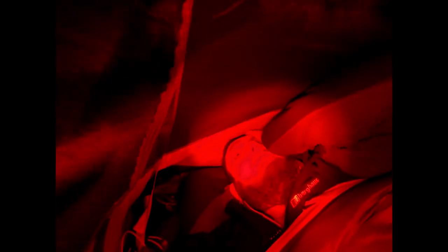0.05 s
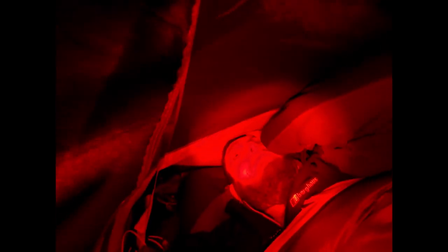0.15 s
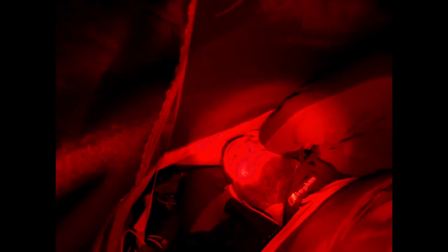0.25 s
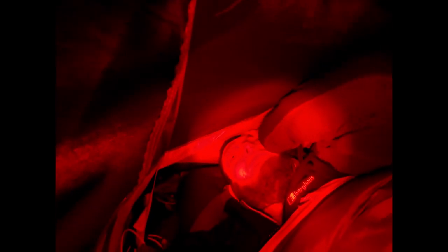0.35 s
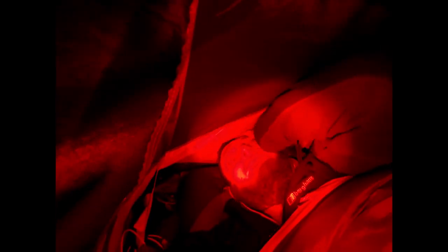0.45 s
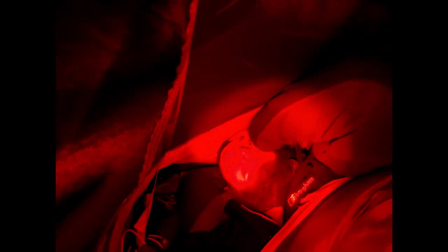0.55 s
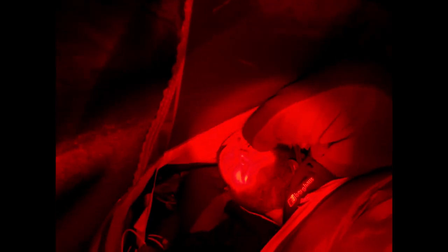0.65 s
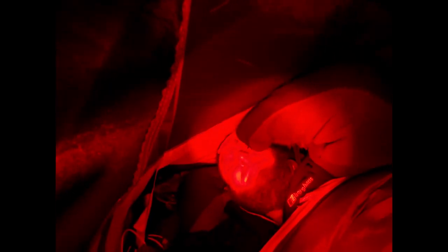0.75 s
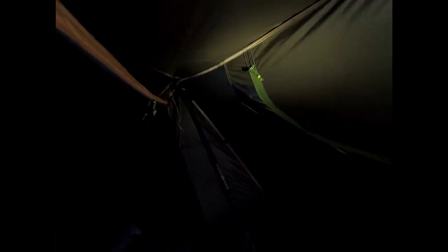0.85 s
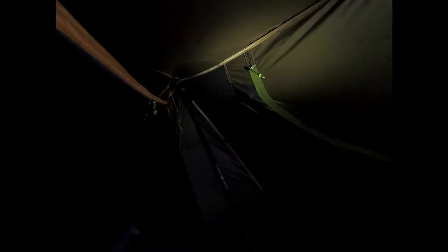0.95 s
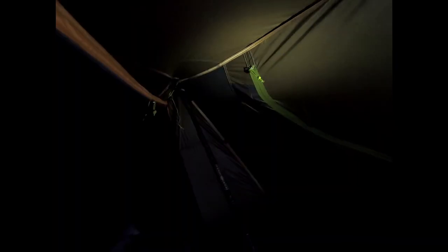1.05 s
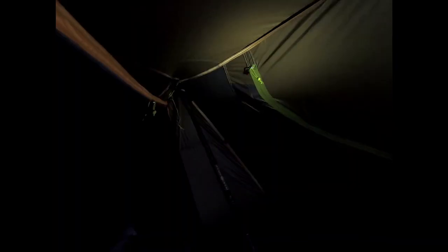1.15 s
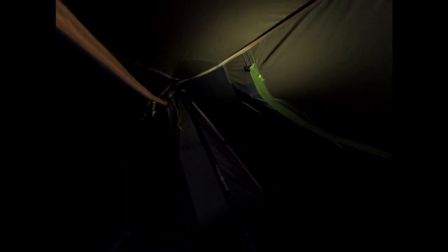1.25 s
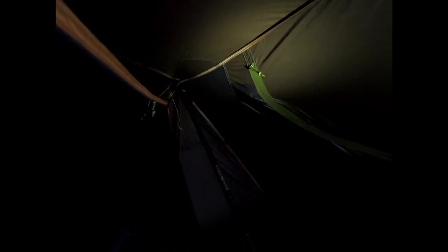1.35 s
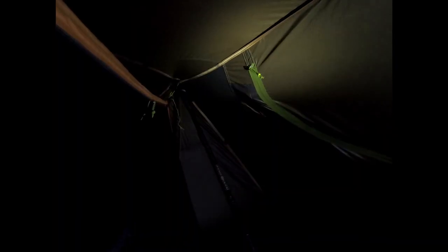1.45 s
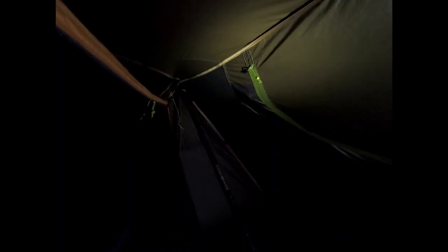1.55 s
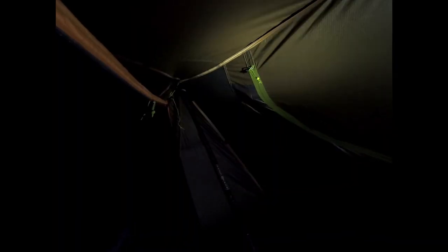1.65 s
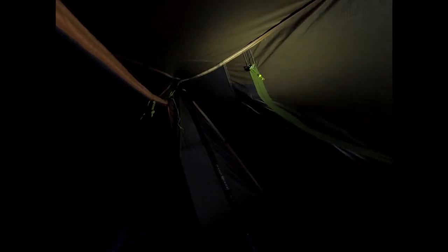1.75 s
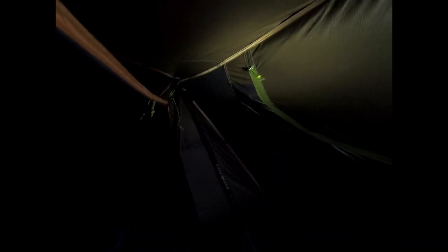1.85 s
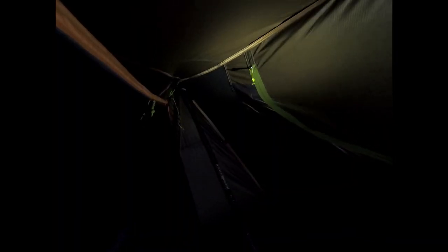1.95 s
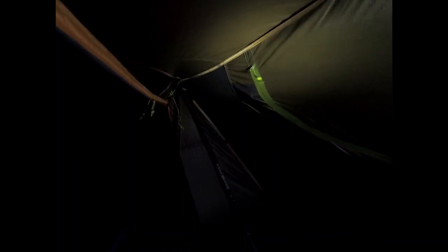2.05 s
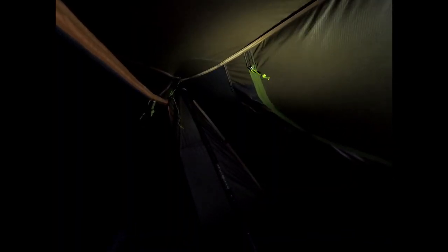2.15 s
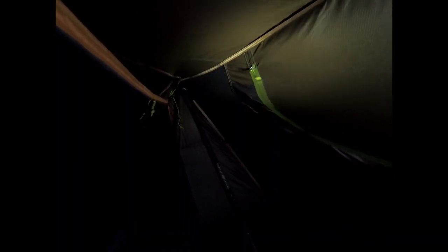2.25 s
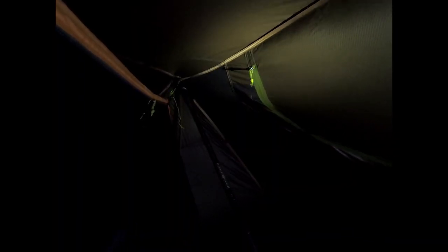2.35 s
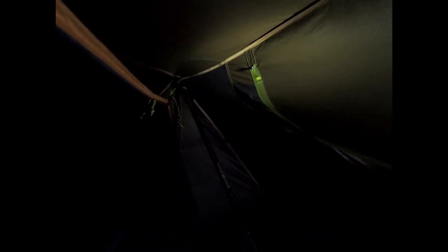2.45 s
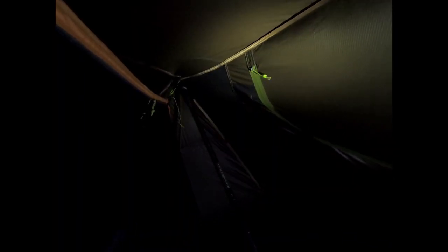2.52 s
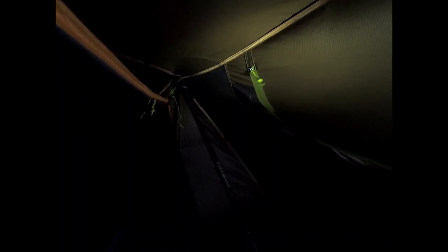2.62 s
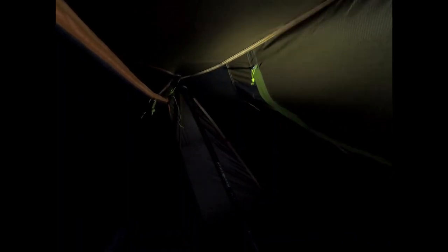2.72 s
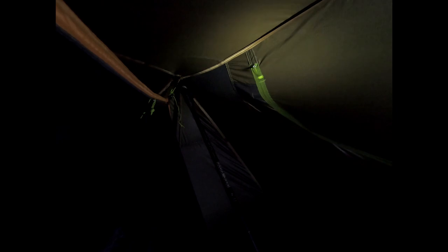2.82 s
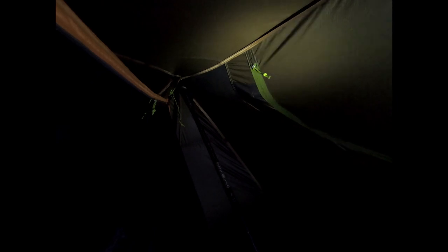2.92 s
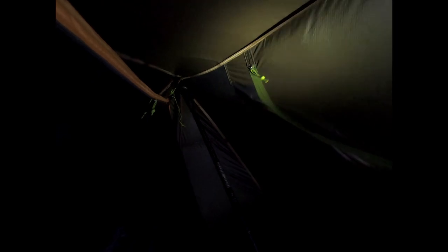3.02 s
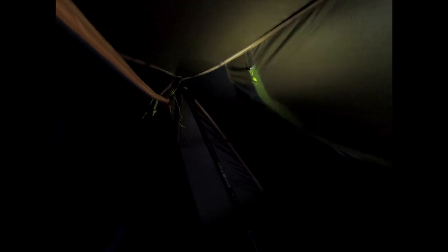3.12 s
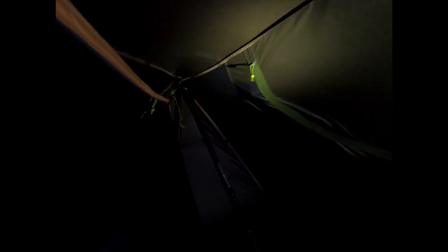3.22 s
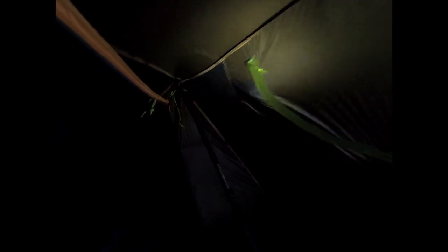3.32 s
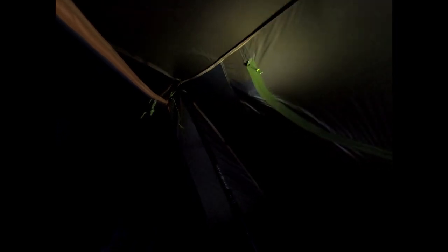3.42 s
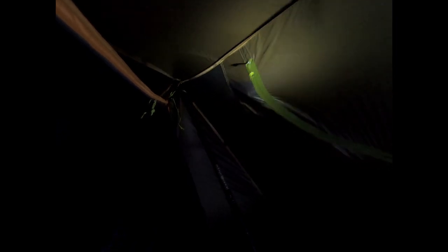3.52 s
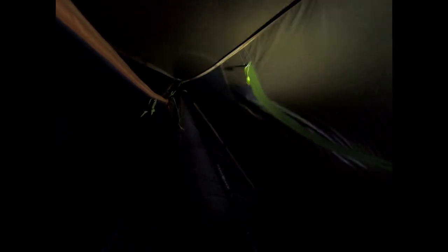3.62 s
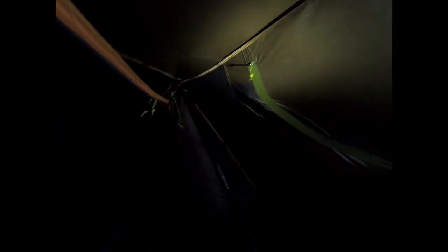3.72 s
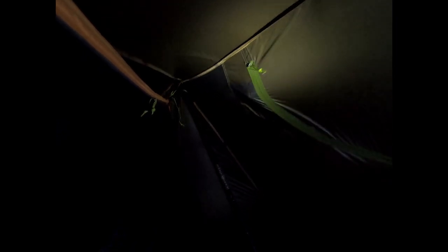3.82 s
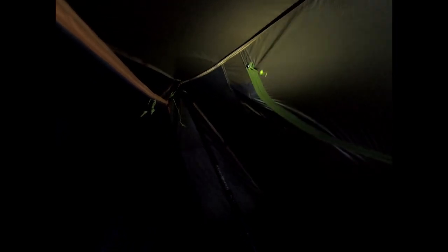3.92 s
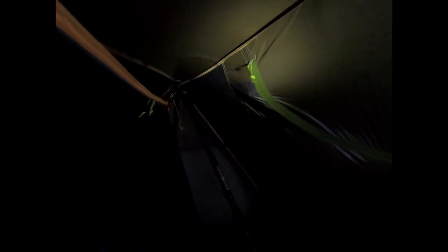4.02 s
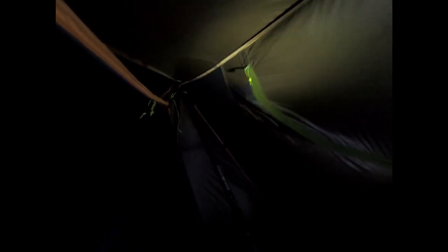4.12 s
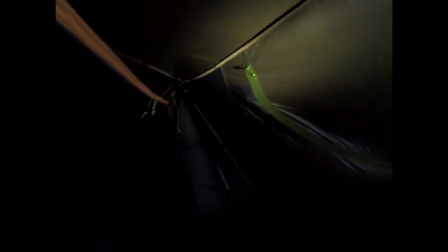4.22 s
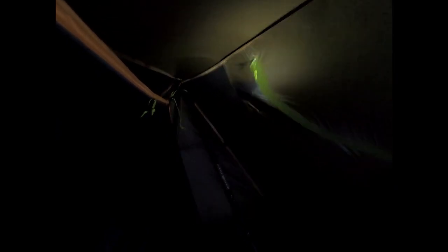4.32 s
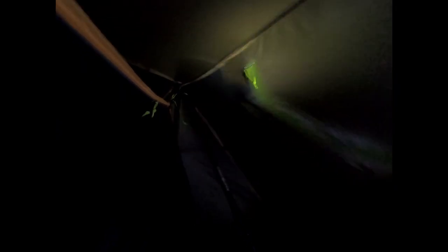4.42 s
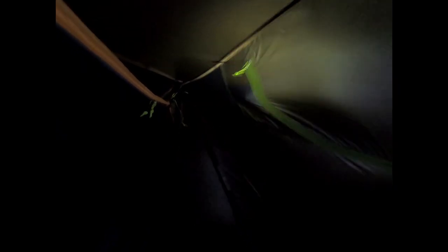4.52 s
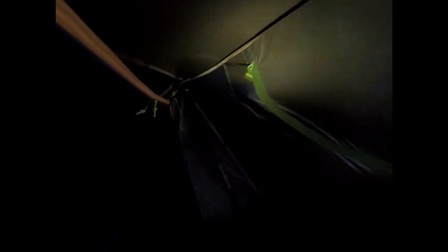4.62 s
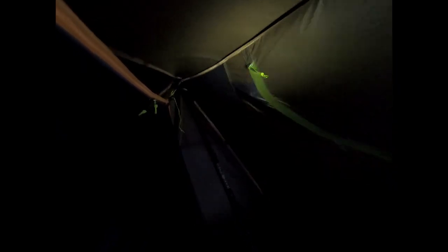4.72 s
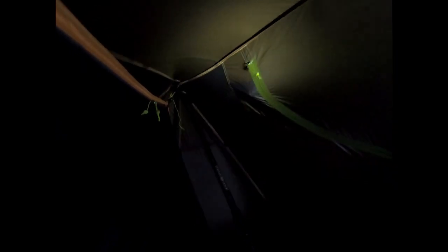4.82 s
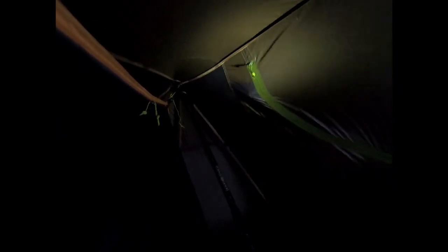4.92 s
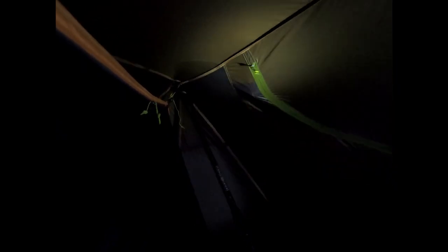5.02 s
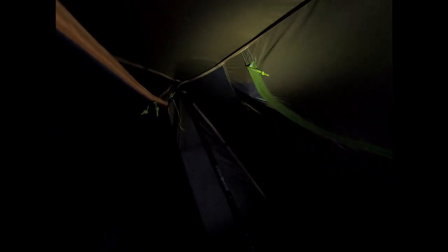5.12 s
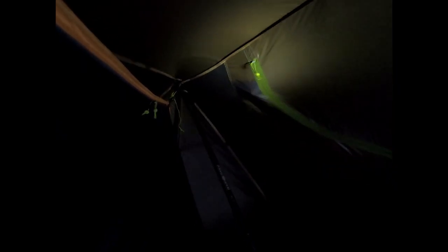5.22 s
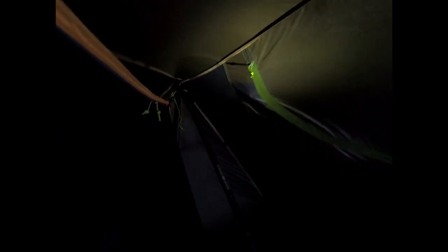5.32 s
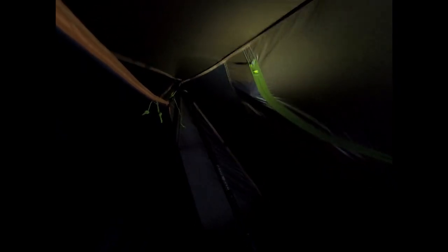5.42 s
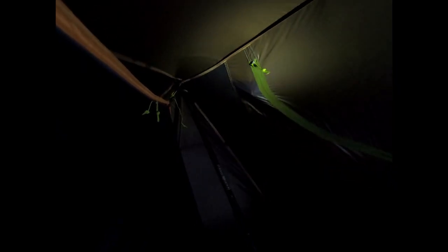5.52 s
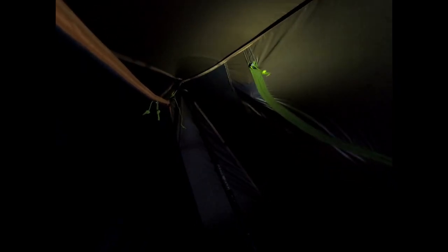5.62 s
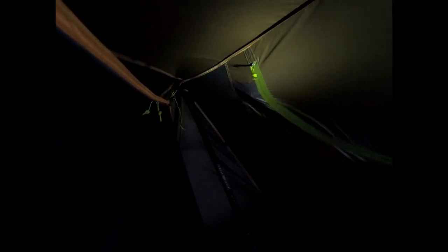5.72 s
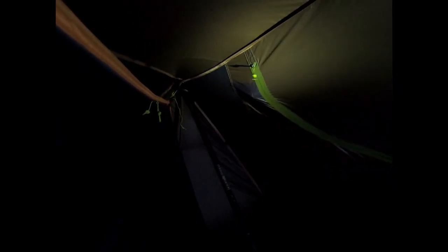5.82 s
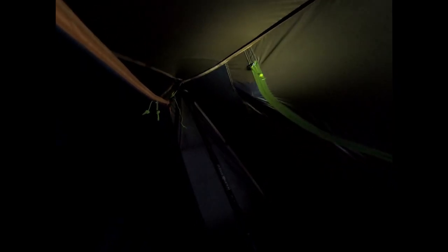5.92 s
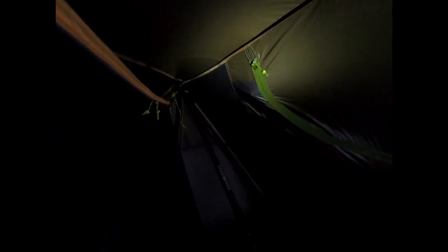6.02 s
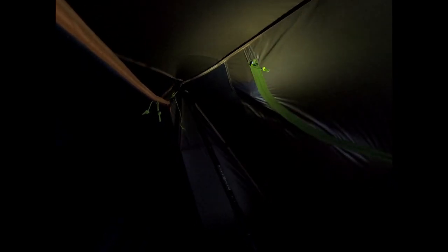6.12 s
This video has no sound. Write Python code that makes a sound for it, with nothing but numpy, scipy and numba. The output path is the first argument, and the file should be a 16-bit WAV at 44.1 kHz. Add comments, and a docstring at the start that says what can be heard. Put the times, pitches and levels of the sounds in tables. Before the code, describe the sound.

Close stereo sound inside a small tent on a stormy night. First, crisp drops and cloth snaps patter over soft rustling and crackling, mostly towards the left. Then strong gusts arrive with deep bassy thumps, dull thrashing and slapping panels, while a metal zip pull clinks faintly. The wind eases back to light crackle and a few ticks.

```python
"""Inside a small tent on a stormy night, where a two-port microphone lies.
Wind pressure drives the walls: bands of noise heave, rumble and flap, and slack panels thrash dully.
The cloth rustles and crackles: coloured noise, and a random hail of damped swings.
Drops and taut panels snap as bursts of damped swings, and during the stronger gusts, which shake
the frame, a metal zip pull clinks in quick clusters of ringing tones."""
import sys
import numpy as np
from scipy import signal
from scipy.fft import rfft, irfft
from scipy.io import wavfile
from scipy.ndimage import uniform_filter1d
from numba import njit

SR = 44100
rng = np.random.default_rng(int(sys.argv[2]) if len(sys.argv) > 2 else 0)


def log_audio(samples):
    """Write samples as a 16-bit WAV file to the path given in sys.argv[1]."""
    # one column per channel
    frames = np.atleast_2d(samples).T
    # limit to full scale, then quantise
    limited = np.clip(frames, -1, 1)
    pcm = np.round(limited * 32767).astype(np.int16)
    wavfile.write(sys.argv[1], SR, pcm)


N = 272097

# wind pressure on the walls, as the level of their steady rumble: start_s, level_db
WIND_PRESSURE = [(0.0, -41), (0.6, -41), (1.4, -38), (1.62, -40), (2.65, -37), (2.85, -35.5), (3.05, -35),
                 (3.2, -25.5), (3.36, -29), (3.55, -21.5), (3.8, -20), (3.88, -27.5), (4.08, -29.5),
                 (4.3, -23), (4.44, -19), (4.65, -23.5), (4.86, -27), (4.92, -30), (5.41, -30), (5.95, -37),
                 (6.17, -37)]
# single buffets that thump the walls; rise from half amplitude to the peak:
# peak_s, heave_db, rumble_db, flapping_db, rise_s
BUFFETS = [(1.41, -43, -49, -59, 0.024), (1.75, -53, -50, -40, 0.07), (2.001, -51, -35, -46, 0.075),
           (2.35, -45, -37, -41, 0.21), (2.78, -31.5, -47, -50, 0.042), (3.14, -23.5, -44, -33.5, 0.064),
           (3.234, -13, -18, -26, 0.026), (3.335, -18, -22, -44, 0.009), (3.431, -16.5, -29, -31.5, 0.032),
           (3.55, -22, -28, -32, 0.012), (3.75, -35, -21.5, -29.5, 0.072), (3.8, -23, -30, -33, 0.026),
           (3.849, -30, -18, -35, 0.013), (4.14, -20.5, -22.5, -36, 0.059), (4.217, -12, -10, -25, .016),
           (4.28, -17, -29, -33.5, 0.018), (4.32, -24, -21, -30.5, 0.013), (4.39, -31, -18, -26.5, 0.065),
           (4.46, -28, -12.5, -23, 0.043), (4.498, -28, -16, -20, 0.02), (4.585, -24, -20.5, -24, 0.05),
           (4.74, -24, -42, -30, 0.04), (4.875, -36, -22.5, -35, 0.018), (5.131, -28, -40, -32.5, 0.016),
           (5.53, -23, -38, -52, 0.02), (6.1, -37, -32, -60, 0.071)]
# relative spectrum of the wall motion: frequency_hz, density_db (per Hz)
WALL_SPECTRUM = [(11, -33), (18, -13), (43, -1.5), (102, 0), (245, -13.5), (400, -25), (640, -35),
                 (800, -50), (1320, -120)]
# relative spectrum of the cloth noise: frequency_hz, density_db (per Hz)
CLOTH_SPECTRUM = [(180, -32), (300, -12), (500, -0.5), (1100, 0.5), (1600, 0), (3300, -3), (4600, -9),
                  (7000, -8.5), (16000, -20.5)]
# steady activity of the cloth surface: start_s, rustle_db, crackle_db
CLOTH_ACTIVITY = [(0.0, -46, -40.5), (0.15, -50, -43.5), (0.25, -47, -44.5), (0.7, -47, -45.5),
                  (1.15, -45, -42.5), (1.3, -42.5, -38.5), (1.9, -43.5, -39), (2.08, -40.5, -41),
                  (2.76, -44.5, -42), (2.94, -43, -51.5), (3.04, -42.5, -44.5), (3.2, -45, -37.5),
                  (3.55, -43, -40.5), (3.86, -42.5, -44), (4.14, -47.5, -39), (4.4, -35.5, -38),
                  (4.6, -37.5, -36.5), (4.88, -47, -40.5), (5.03, -46, -45), (5.3, -46.5, -42.5),
                  (5.66, -44.5, -43), (5.93, -47, -45.5), (6.17, -42, -41.5)]
# panels sweeping over each other; half the length is the rise from half amplitude:
# peak_s, rustle_db, treble_db, length_s
SWISHES = [(0.078, -37, -48, 0.03), (0.923, -54, -64, 0.037), (1.466, -51, -51, 0.076),
           (1.697, -49, -49, 0.05), (2.64, -44.5, -50.5, 0.16), (3.157, -46, -46.5, 0.11),
           (3.297, -30, -42, 0.027), (3.614, -39, -58, 0.069), (3.758, -36.5, -42.5, 0.2),
           (4.209, -34, -46, 0.059), (4.474, -30.5, -40, 0.05), (4.686, -47, -52, 0.03),
           (4.766, -35.5, -50, 0.059), (4.933, -59, -53, 0.026), (5.182, -44.5, -55, 0.12),
           (5.487, -42, -46.5, 0.19), (5.589, -39, -46, 0.059), (5.737, -47, -50.5, 0.06),
           (6.097, -48, -45, 0.16)]
# where the cloth noise sits: start_s, left_minus_right_db
CLOTH_POSITION = [(0.0, 5), (0.65, 0.5), (1.18, 3.5), (3.21, 0), (3.88, 0.5), (4.18, 1.5), (6.17, 0)]
# strikes of the zip pull, relative level: start_s, level_db, left_minus_right_db
CLINKS = [(3.1417, -28.5, 4.5), (3.301, -32, 11), (3.392, -26, 9), (3.5653, -26, 11), (3.7277, -29.5, 3),
          (3.915, -31, 9.5), (3.9843, -42, 3.5), (4.4293, -35, 7), (4.7454, -35.5, 5.5)]
# ringing modes of the zip pull, relative level and time to fall 60 dB: pitch_hz, level_db, t60_s
ZIP_MODES = [(6970, 2, 0.087), (7040, 12, 0.0094), (7100, 9, 0.011), (7440, -3, 0.031)]
# loud snaps, relative levels of the broad body and the bright crack:
# start_s, body_db, crack_db, left_minus_right_db
SNAPS = [(0.016, -20, -42, 8), (0.053, -9, -56, 5.5), (0.071, -27, -42, 8), (0.079, -13, -29.5, 8),
         (0.085, -29, -40, 5), (0.093, -34, -39, 4), (0.099, -30, -41, 5), (0.116, -33, -44, 8),
         (0.128, -24, -45, 5.5), (0.136, -32, -39, 9), (0.15, -22, -39, 8), (0.155, -21, -35, 9.5),
         (0.167, -19, -48, 17.5), (0.2, -29, -45, 9), (0.24, -25, -57, 11.5), (0.551, -24, -58, 4.5),
         (0.717, -23.5, -60, 1.5), (0.854, -21, -37.5, 7.5), (0.89, -18, -35, 8), (0.912, -22, -42, 2),
         (0.929, -16.5, -27.5, -0.5), (0.971, -19.5, -51, 2), (0.988, -21, -50, 16), (1.047, -15, -45, 6.5),
         (1.08, -19, -49, 5), (1.106, -20.5, -48, 16), (1.116, -17, -39, 9), (1.139, -23, -44.5, 12),
         (1.199, -20.5, -43, 16.5), (1.22, -20, -41, 7.5), (1.241, -16.5, -46, 15.5), (1.265, -21, -46, 9),
         (1.29, -16, -59, 13), (1.35, -20, -47, 12), (1.361, -13.5, -57, 15), (1.392, -17, -31, 9.5),
         (1.43, -24, -42, 0), (1.442, -14, -34, 5.5), (1.445, -22, -43, 3.5), (1.455, -17, -33, 14),
         (1.487, -25, -40, 6), (1.495, -23, -35, 6.5), (1.546, -19, -32.5, 11), (1.571, -18.5, -25, 5),
         (1.601, -18.5, -34, 13), (1.612, -24, -32.5, 11), (1.625, -30, -33, 5), (1.64, -19, -30.5, 5),
         (1.657, -13.5, -54, 3.5), (1.694, -36, -35, 4), (1.745, -9.5, -45, 4), (1.786, -32, -37, 8),
         (1.816, -16, -39, 7.5), (1.823, -19.5, -42, 12), (1.857, -23, -41, 13.5), (1.881, -16, -31.5, -1),
         (1.913, -15.5, -44, 3.5), (1.946, -25, -42, 11), (1.96, -15, -43, 7), (2.021, -22, -40, 6),
         (2.048, -31, -41, 2.5), (2.345, -21, -54, -2), (2.79, -29, -49, -0.5), (3.079, -32, -34.5, -1.5),
         (3.124, -43, -31, 0), (3.166, -35, -42, 0), (3.201, -11.5, -39, 3), (3.22, -27, -33, 7),
         (3.241, -17, -34, -1.5), (3.285, -21, -31, -1.5), (3.522, -13.5, -57, 4), (3.628, -11, -44, -2),
         (3.665, -13, -39, 0.5), (3.696, -27, -25, 9.5), (3.731, -21, -45, 7), (3.762, -22, -45, 0),
         (3.784, -22, -28, -2.5), (3.804, -29, -35, 6), (4.036, -32, -33, 2.5), (4.192, -15, -37, 0.5),
         (4.217, -12, -41, -0.5), (4.258, -22, -28.5, -0.5), (4.284, -12.5, -25, -0.5),
         (4.318, -21, -50, 0), (4.346, -26, -36, -6.5), (4.366, -16, -37, -2), (4.401, -23, -35, 2),
         (4.438, -13, -30, 7.5), (4.451, -10, -48, -4), (4.485, -5.5, -32, -11.5), (4.496, -15, -45, 0),
         (4.502, -15, -48, -3.5), (4.566, -9.5, -52, 5.5), (4.586, -10.5, -50, 3.5), (4.63, -11, -54, -2.5),
         (4.678, -19, -29, -1.5), (4.711, -22, -52, -2.5), (4.697, -16, -54, -6.5), (5.122, -30, -31, 5.5),
         (5.194, -33, -29.5, 1), (5.218, -41, -36, -2), (5.286, -20, -53, 1.5), (5.38, -27, -34, 2),
         (5.432, -24, -30, 2), (5.444, -34, -33, -3), (5.764, -32, -40, -3.5), (5.833, -23, -39, 4.5),
         (5.966, -20.5, -43, 3.5), (5.982, -21, -45, 11), (6.035, -32, -34, 1.5), (6.1, -37, -35.5, 0),
         (6.155, -43, -37, 0)]
# how unlike the two ports hear, as gain on their difference: frequency_hz, gain_db
PORT_DIFFERENCE = [(1000, -0.7), (2200, -2.5), (4000, -6.5), (8000, 1.8), (12000, -1.5)]
# left port over right port: frequency_hz, left_minus_right_db
PORT_LEAN = [(60, -0.2), (600, -1), (2200, -0.8), (4500, -1.7), (10000, -0.4)]
# response of the microphone: frequency_hz, gain_db
MIC_RESPONSE = [(6000, 1), (7300, 0.5), (8000, -4.5), (10000, -2.5), (11300, -14), (15500, -15)]

CALM_DB = -42  # wind pressure level taken as calm
HEAVE_DB, HEAVE_PER_DB = -49.5, 1.2072  # steady heave in calm wind, and its rise per dB of pressure
FLAP_DB, FLAP_PER_DB = -41, 0.37  # the same for the flapping
BUFFET_FALL, SWISH_FALL = 0.73, 0.88  # fall time as a share of the rise time
TREBLE_DB, TREBLE_PER_DB = -60, 1.76  # treble hiss at crackle -42.5 dB, and its rise per dB of crackle
TREBLE_FLOOR_DB = -67  # steady hiss
SWISH_CRACKLE_DB = 7  # crackle of a swish over its treble
PORTS_HZ, LEAK_DB = 540, -26  # below this the ports hear nearly the same pressure; difference left over
TOP_HZ = 15700  # upper edge of the band
LEVEL_STEP = 64  # samples between points of a coarse level


def undb(db):
    """Amplitude is ten to the power of a twentieth of the level in dB."""
    return 10 ** (np.asarray(db) / 20)


def add_db(*levels):
    """Independent sources add in power; the sum is given in dB."""
    return 10 * np.log10(sum(undb(db) ** 2 for db in levels))


def unit(x):
    """Normalization: effective amplitude, or rms, is set to 1."""
    return x / np.sqrt(np.mean(x ** 2))


def curves(table):
    """Linear interpolation of a table's columns to every sample."""
    s, *columns = np.transpose(table)
    return [np.interp(np.arange(N) / SR, s, column) for column in columns]


def read(spectrum, hz):
    """Interpolation in dB along a logarithmic frequency axis."""
    at_hz, db = np.transpose(spectrum)
    return np.interp(np.log(hz), np.log(at_hz), db)


def swell_db(s, attack_s, release_s):
    """Bell-shaped growth and decay: dB under the peak, one coarse row per event."""
    t = np.arange(0, N, LEVEL_STEP) / SR - np.asarray(s)[:, None]
    progress = np.where(t < 0, t / attack_s, t / release_s)
    return np.maximum(-6 * progress ** 2, -120)


def fine(db):
    """Linear interpolation of a coarse level to every sample."""
    return np.interp(np.arange(N), np.arange(len(db)) * LEVEL_STEP, db)


def walk(rate):
    """Random modulation: levels held 1 / rate s and smoothed twice; spread near 1."""
    hold = int(SR / rate)
    steps = np.repeat(rng.standard_normal(N // hold + 1), hold)
    return 0.78 * uniform_filter1d(uniform_filter1d(steps, hold), hold)[:N]


def butter(x, order, hz, kind):
    """Causal Butterworth filtering: maximally flat within its passband."""
    return signal.sosfilt(signal.butter(order, hz, kind, fs=SR, output="sos"), x)


def band(lo_hz, hi_hz, db):
    """Band-limited noise, uncorrelated between left and right."""
    return undb(db) * butter(rng.standard_normal((2, N)), 2, [lo_hz, hi_hz], "bandpass")


def colour(x, spectrum, size=2048):
    """Minimum-phase filtering: the folded cepstrum makes a given spectrum causal."""
    hz = np.linspace(1, SR / 2, size // 2 + 1)
    cepstrum = irfft(np.log(undb(read(spectrum, hz))))
    cepstrum[1:size // 2] *= 2
    cepstrum[size // 2 + 1:] = 0
    response = irfft(np.exp(rfft(cepstrum)))
    return signal.fftconvolve(x, response[None], axes=1)[:, :N]


@njit
def grains(s, hz, t60, left, right, lag):
    """Damped oscillation that starts with a pull; the right port hears it a little earlier or later."""
    out = np.zeros((2, N + 8192))
    for k in range(len(s)):
        # one complex factor turns and damps the swing at each sample
        pole = np.exp((2j * np.pi * hz[k] - np.log(1000) / t60[k]) / SR)
        # the 32-sample margin leaves room for a negative lag
        i, z = int(s[k] * SR) + 32, 1 + 0j
        for j in range(min(int(t60[k] * SR), 8000)):
            out[0, i + j] -= left[k] * z.imag
            out[1, i + j + lag[k]] -= right[k] * z.imag
            z *= pole
    return out[:, 32:N + 32]


def strike(s, db, hz, t60, pan_db, samples_per_db=2.5):
    """Level and time difference between ports: the nearer one hears a swing louder and sooner."""
    lag = np.clip(samples_per_db * pan_db, -30, 30).astype(np.int64)
    return grains(s, hz, t60, undb(db + pan_db / 2), undb(db - pan_db / 2), lag)


def crackle(rate, spread_db, centre_hz, cycles, most_db=22):
    """Random impulsive excitation: a hail of small damped cloth ticks whose loudness wanders slightly."""
    chance = rng.random((int(rate * N / SR), 4)).T
    s = chance[0] * N / SR
    wander_db = 0.95 * walk(40)[(s * SR).astype(int)]
    db = -spread_db * np.log(1 - chance[1]) + wander_db
    hz = np.minimum(centre_hz * 2 ** (3.9 * (chance[2] - .5)), .4 * SR)
    # higher swings are shorter, so they need more height for an even spectrum
    db = np.minimum(db, most_db) + 14 * np.log10(hz / centre_hz)
    return unit(strike(s, db, hz, cycles / hz, 18 * (chance[3] - .5)))


def tent_tail(x, t60=0.03, wet_db=-3.0, count=8):
    """Diffuse decay: every tick is followed by a short diffuse wash, unlike at each port."""
    t = np.arange(int(.05 * SR)) / SR
    decay = np.exp(-np.log(1000) * t / t60) * (t > .0008)
    tails = rng.standard_normal((count, 2, len(t))) * decay
    tails /= np.sqrt(np.sum(tails ** 2, axis=2, keepdims=True))
    # another random tail is drawn every 400 samples
    choice = np.repeat(rng.integers(0, count, N // 400 + 1), 400)[:N]
    wash = sum(signal.oaconvolve(x * (choice == k), tails[k], axes=1)[:, :N] for k in range(count))
    return x + undb(wet_db) * wash


def wall_levels():
    """Forced motion: heave, rumble and flapping follow the pressure; buffets add short thumps."""
    wind_db, = curves(WIND_PRESSURE)
    above_calm_db = wind_db - CALM_DB
    steady = HEAVE_DB + HEAVE_PER_DB * above_calm_db, wind_db, FLAP_DB + FLAP_PER_DB * above_calm_db
    s, *peaks, rise = np.transpose(BUFFETS)[:, :, None]
    shape = swell_db(s[:, 0], rise, BUFFET_FALL * rise)
    return [add_db(db, fine(add_db(*(shape + peak)))) for db, peak in zip(steady, peaks)]


def walls():
    """Membranes under turbulent pressure: third-octave noise bands, each buffeting alone, in three groups."""
    edges = 18 * 2 ** np.arange(0, 5.1, 1 / 3)  # Hz
    parts = []
    for lo_hz, hi_hz in zip(edges, edges[1:]):
        level_db = read(WALL_SPECTRUM, np.sqrt(lo_hz * hi_hz)) + 2.66 * walk(9)
        parts.append(band(lo_hz, hi_hz, level_db))
    groups = parts[:4], parts[4:9], parts[9:]  # heave, rumble, flapping
    return sum(unit(sum(group)) * undb(db) for group, db in zip(groups, wall_levels()))


def thrash():
    """Repeated impact of slack panels: dull, dense blows that grow faster than the flapping itself."""
    flap_db = wall_levels()[2]
    blows = tent_tail(crackle(350, 3.1, 616, 2.65, most_db=8.5))
    blows = butter(blows, 2, [260, 1400], "bandpass")
    return unit(blows) * undb(-37 + 1.12 * (flap_db + 30.0))


def cloth_levels():
    """Common excitation: treble hiss follows the crackle; a swish lifts rustle, treble and crackle."""
    rustle_db, crackle_db = curves(CLOTH_ACTIVITY)
    treble_db = TREBLE_DB + TREBLE_PER_DB * (crackle_db + 42.5)
    s, low_db, high_db, length = np.transpose(SWISHES)[:, :, None]
    shape = swell_db(s[:, 0], length / 2, SWISH_FALL * length / 2)
    low_db, high_db = fine(add_db(*(low_db + shape))), fine(add_db(*(high_db + shape)))
    rustle_db = add_db(rustle_db, low_db)
    treble_db = add_db(treble_db, high_db, TREBLE_FLOOR_DB)
    return rustle_db, treble_db, add_db(crackle_db, high_db + SWISH_CRACKLE_DB)


def cloth():
    """Friction noise: hiss in two ranges and crackle, all through the colour of the cloth."""
    rustle_db, treble_db, crackle_db = cloth_levels()
    pan_db, = curves(CLOTH_POSITION)
    edges = 300 * 2 ** np.arange(0, 5.8, .5)  # Hz, half-octave bands
    flutter = walk(14)  # shared by all bands
    bands = sum(band(lo, hi, 2.0 * flutter + 2.0 * walk(20)) for lo, hi in zip(edges, edges[1:]))
    hiss = colour(bands, CLOTH_SPECTRUM)
    # zero phase, so that the rustle is exactly what the treble leaves
    treble = signal.sosfiltfilt(signal.butter(2, 4300, "highpass", fs=SR, output="sos"), hiss)
    ticks = colour(tent_tail(crackle(900, 5.3, 4370, 3.35, most_db=16.5)), CLOTH_SPECTRUM)
    x = unit(hiss - treble) * undb(rustle_db) + unit(treble) * undb(treble_db)
    x = x + unit(ticks) * undb(crackle_db)
    return x * undb(np.array([pan_db, -pan_db]) / 2)


def zip_pull(count=6, spread_s=0.011):
    """Modal vibration: a clink is a quick cluster of ringing tones, each mode struck at its own random moments."""
    out = 0
    s, db, pan_db = np.repeat(CLINKS, count, axis=0).T
    for hz, mode_db, t60 in ZIP_MODES:
        chance = rng.random((len(s), 2)).T
        tone_s = s + spread_s * chance[0]
        tone_db = db + mode_db - 11 - 8 * chance[1]
        out = out + strike(tone_s, tone_db, hz + 0 * s, t60 + 0 * s, pan_db)
    return out


def snaps(count=8, onset_s=0.00118, cycles=2.26):
    """Sudden release of tension: creases let go in one broad pull, then weaker swings low and high."""
    s, body_db, crack_db, pan_db = np.repeat(SNAPS, count, axis=0).T
    chance = rng.random((len(s), 3)).T
    after = np.arange(len(s)) % count > 0  # all but the first swing of a snap
    # under a strong gust whole panels slap: longer, deeper, with a softer start
    flap_db = wall_levels()[2][(s * SR).astype(int)]
    gust = np.clip((flap_db + 39.5) / 12, 0, 1)
    late = chance[0] * after
    s, spread_s = s + onset_s, (.003 + .005 * gust) * late
    body_hz = np.where(after, 480 * 7.3 ** chance[1], 1900) * (1 - 0.21 * gust)
    crack_hz = np.where(after, 2300 * 4.6 ** chance[2], 3500)
    fade_db = -(11 - 7 * gust) * after - 9 * late - 2.1 * gust
    tilt_db = 3.5 * (1 - gust) * np.log10(body_hz / 1900)
    body = strike(s + spread_s, body_db + 5.0 + fade_db + tilt_db, body_hz, cycles / body_hz, pan_db)
    # the bright crack is over almost at once, unless a gust drags it out
    crack_s = s + (0.4 + 0.5 * gust) * spread_s
    crack = strike(crack_s, crack_db + 21.5 + fade_db - 3 * after, crack_hz, 2.26 / crack_hz, pan_db)
    body = butter(body, 1, 6500, "lowpass")
    # the high-pass keeps offset and bass out of the snaps
    thin = butter(body + crack, 2, 280, "highpass")
    return tent_tail(thin, t60=0.0059, wet_db=-5.0)


def scene():
    """Superposition of all the sounds inside the tent."""
    return walls() + thrash() + cloth() + snaps() + zip_pull()


def record(dry):
    """Pressure at close ports agrees in the bass; the microphone dulls the treble and a steep cut ends it."""
    mid, side = (dry[0] + dry[1]) / 2, (dry[0] - dry[1]) / 2
    apart = signal.sosfiltfilt(signal.butter(2, PORTS_HZ, "highpass", fs=SR, output="sos"), side)
    hz = np.linspace(1, SR / 2, N // 2 + 1)
    side = irfft(rfft(apart) * undb(read(PORT_DIFFERENCE, hz)), N) + undb(LEAK_DB) * side
    lean_db = read(PORT_LEAN, hz) * np.array([[.5], [-.5]])
    ports = irfft(rfft(np.array([mid + side, mid - side])) * undb(lean_db), N)
    heard = colour(ports, MIC_RESPONSE)
    return signal.sosfilt(signal.ellip(12, .2, 70, TOP_HZ, fs=SR, output="sos"), heard)


dry = scene()
out = record(dry)
log_audio(out)
```